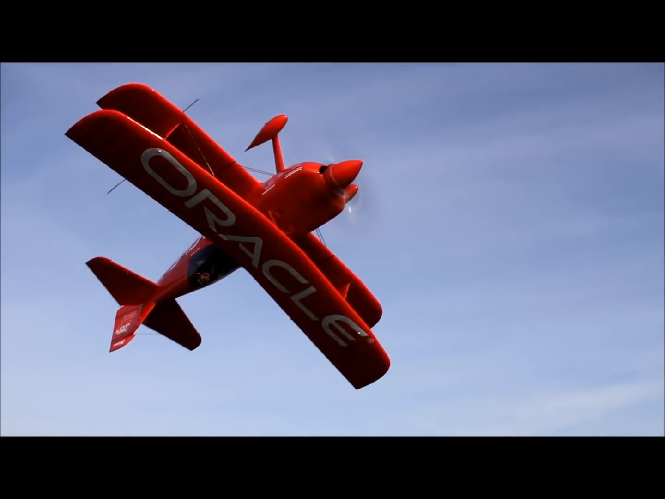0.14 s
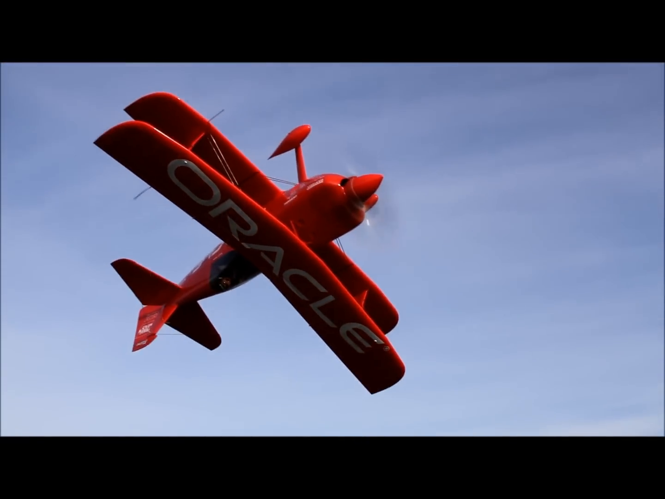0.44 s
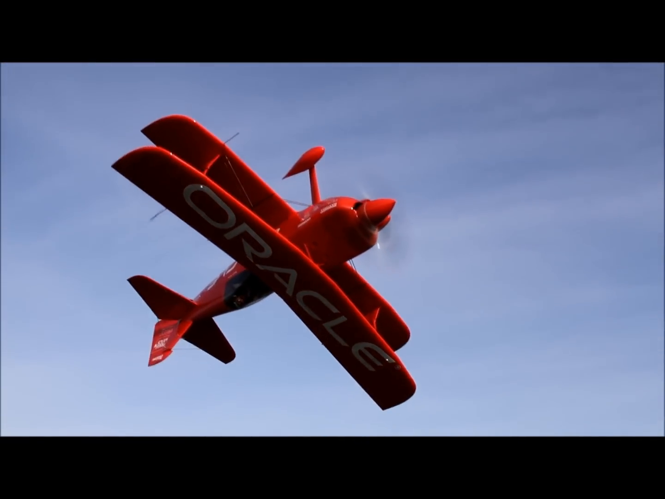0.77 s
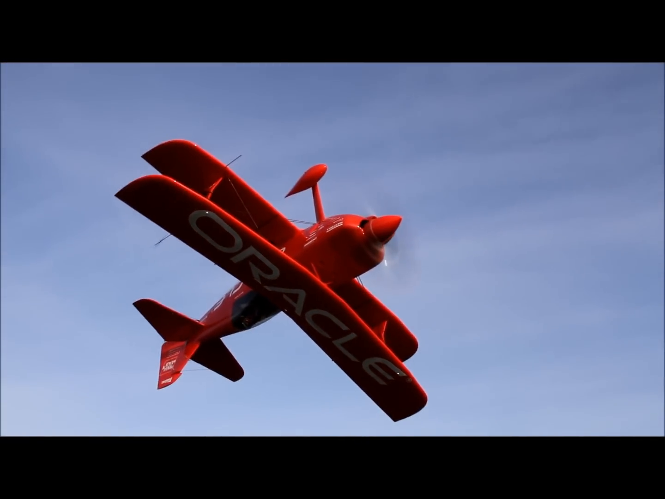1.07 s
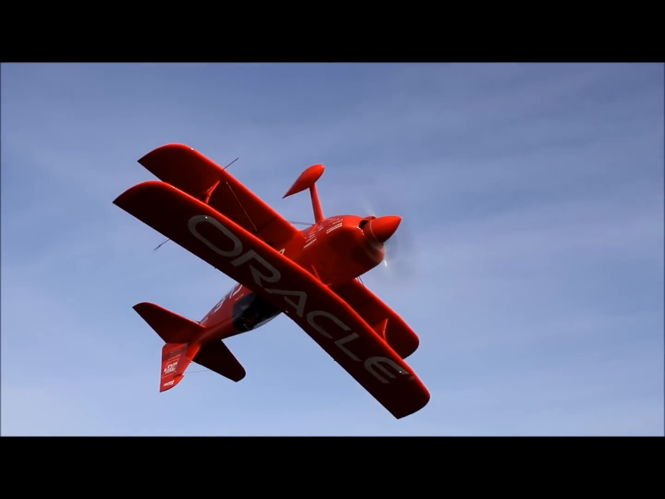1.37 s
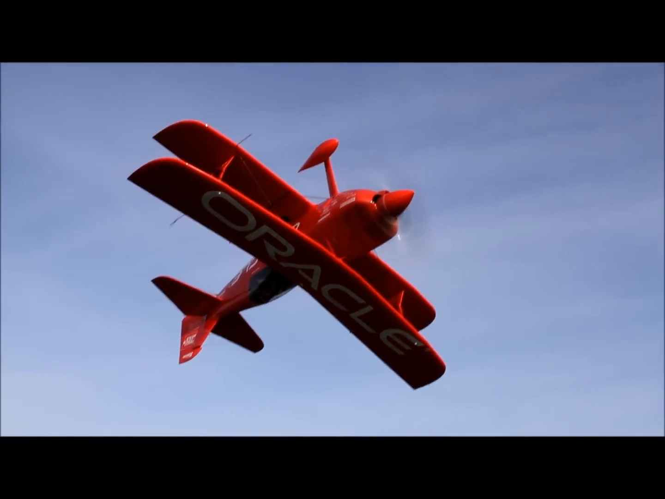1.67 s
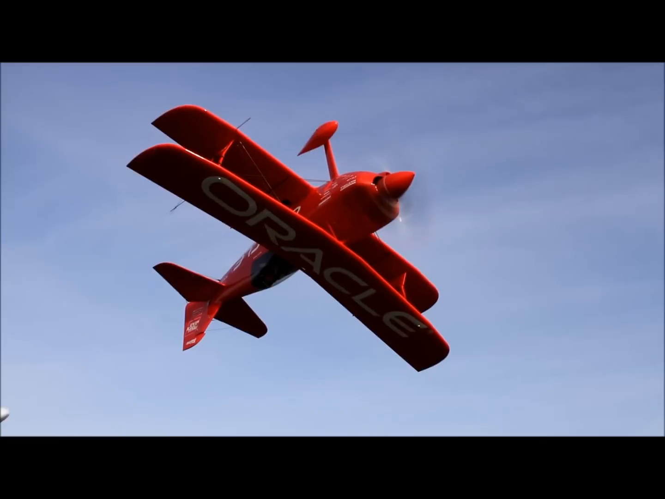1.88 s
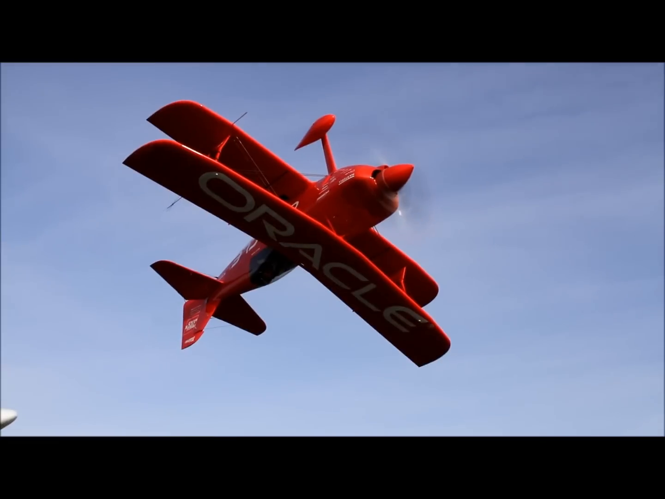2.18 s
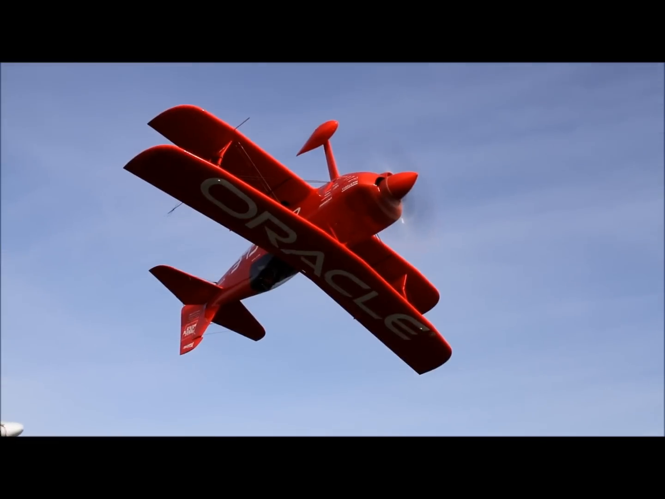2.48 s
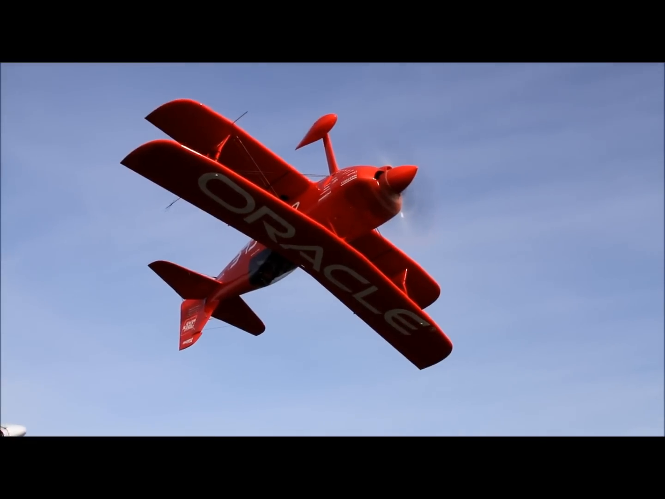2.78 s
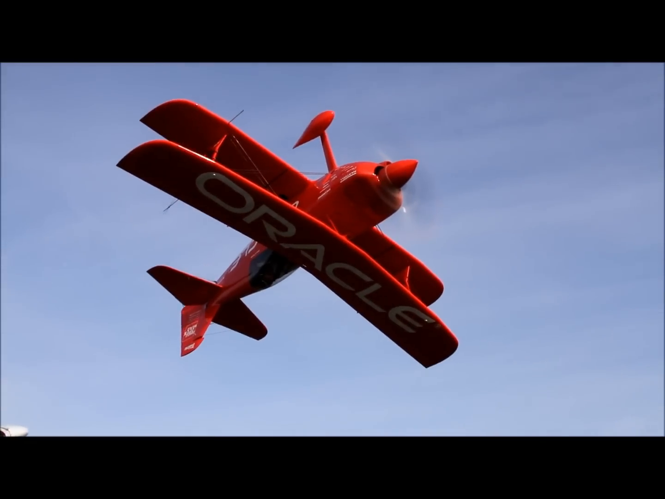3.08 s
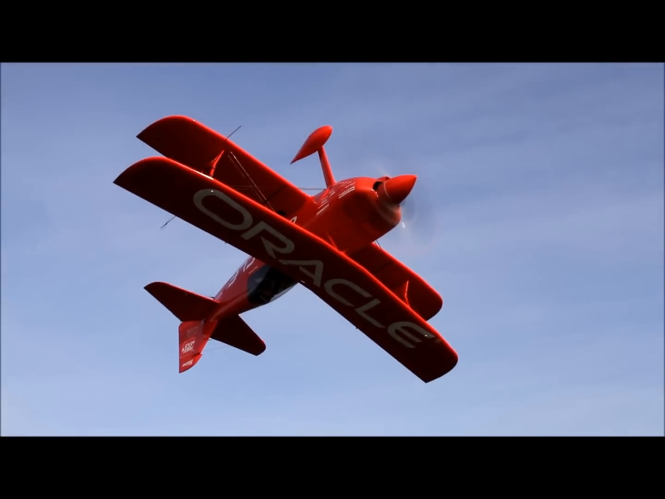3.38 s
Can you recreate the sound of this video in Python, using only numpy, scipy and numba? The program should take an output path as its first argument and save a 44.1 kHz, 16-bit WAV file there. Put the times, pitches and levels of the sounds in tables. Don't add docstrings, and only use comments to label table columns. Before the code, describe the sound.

Steady, loud propeller-engine drone and slipstream roar in open air beside an aerobatic biplane. The exposed microphone thuds and distorts with random low throbs, cutting the roar out for instants, with a brief rap late on.

```python
import sys
import numpy as np
from scipy import signal
from scipy.fft import rfft, irfft
from scipy.io import wavfile
from scipy.ndimage import uniform_filter1d
from numba import njit

SR = 44100
rng = np.random.default_rng(int(sys.argv[2]) if len(sys.argv) > 2 else 0)


def amplitude_ratio(level_db):
    exponent = np.asarray(level_db, float) / 20
    return 10 ** exponent


def store_wav(level_fs):
    pcm = np.round(np.clip(np.atleast_2d(level_fs), -1, 1) * 32767)
    wavfile.write(sys.argv[1], SR, pcm.T.astype(np.int16))


N = 156114
RAIL = 0.35


def level(x, rms_db):
    return x * amplitude_ratio(rms_db) / np.sqrt(np.mean(x ** 2))


@njit
def svf(x, hz, width_hz, high):
    y, band, low = np.empty(len(x)), 0., 0.
    g, k = np.tan(np.pi * hz / SR), width_hz / hz
    for i in range(len(x)):
        v = (band + g * (x[i] - low)) / (1 + g * (g + k))
        y[i] = high * (x[i] - k * v - low - g * v) + (1 - high) * k * v
        band, low = 2 * v - band, low + 2 * g * v
    return y


def bandpass(x, hz, width_hz):
    return svf(x, float(hz), float(width_hz), 0.)


def walk(rate_hz):
    hold = int(SR / rate_hz)
    steps = np.repeat(rng.standard_normal(N // hold + 1), hold)
    slewed = uniform_filter1d(uniform_filter1d(steps, hold), hold)[:N]
    return slewed / slewed.std()


def engine(shaft_hz, wander, flutter_db, orders):
    shaft_rad = 2 * np.pi * np.cumsum(shaft_hz * (1 + wander * walk(4))) / SR
    drone = np.zeros(N)
    for order, rms_db in orders:
        gain = np.sqrt(2) * amplitude_ratio(rms_db + flutter_db * walk(9))
        drone += gain * np.sin(order * shaft_rad + 2 * np.pi * rng.random())
    return drone


def biplane():
    # order in multiples of shaft speed, rms level in dB.
    biplane_orders = [(2, -30), (3, -21.5), (6, -24), (9, -28.5), (12, -35)]
    return engine(shaft_hz=46.44, wander=.003, flutter_db=1.2, orders=biplane_orders)


def own_engine(t):
    # order in multiples of shaft speed, rms level in dB.
    own_orders = [(3, -31), (4.5, -41.5), (6, -21), (8, -37.5), (12, -42.5), (14, -34.5), (15, -40),
                  (16, -40)]
    # time in seconds, sixth-order pitch in Hz, level in dB.
    doorway = [(0.02, 232.4, -17), (0.5, 231.0, -30), (0.51, 230.5, -16), (0.58, 230.6, -24),
               (0.71, 230.6, -19), (1.09, 230.8, -23.5), (1.16, 230.6, -13), (1.66, 230.7, -25),
               (1.87, 230.7, -13.5), (1.96, 230.6, -20), (2.23, 230.8, -22.5), (2.31, 230.7, -28),
               (2.32, 230.6, -18), (3.05, 230.7, -25.5), (3.08, 230.8, -12), (3.17, 230.1, -39),
               (3.29, 230.6, -12.5), (3.5, 230.8, -36)]
    follow = .8
    time_s, _, level_db = np.array(doorway).T
    swell_db = follow * np.interp(t, time_s, level_db - np.median(level_db))
    return amplitude_ratio(swell_db) * engine(shaft_hz=38.49, wander=.0002, flutter_db=.6, orders=own_orders)


def slipstream():
    # frequency in Hz, density in dB per Hz.
    colour = [(90, -8.5), (250, -7), (500, -14.5), (1000, -21.5), (3000, -27.5), (6000, -33.5),
              (10000, -36), (17000, -38.5)]
    swell_db, eddy_db, flicker_db = .3, 1.5, .8
    colour_hz, colour_db = np.array(colour).T
    shared_db = swell_db * walk(2.85) + eddy_db * walk(90)
    roar = np.zeros(N)
    for hz in 90 * 2 ** np.arange(0, 7.6, 1 / 2):
        band_db = np.interp(np.log(hz), np.log(colour_hz), colour_db) + shared_db + flicker_db * walk(12)
        band = bandpass(bandpass(rng.standard_normal(N), hz, hz / 2), hz, hz / 2)
        roar += amplitude_ratio(band_db) * band
    return level(roar, -17.5)


def gusty_air(t):
    # time in seconds, level in dB.
    gusts = [(0, 1), (.25, 0.), (.5, 0.5), (.8, 1), (1.15, 3.5), (1.5, 1), (1.85, .5), (2.1, 2), (2.5, 1.),
             (2.9, 2.5), (3.3, 1), (3.54, 2.5)]
    presence_db, presence_hz, presence_width_hz = 7, 14300, 3500
    gust_s, gust_db = np.array(gusts).T
    air = amplitude_ratio(np.interp(t, gust_s, gust_db)) * slipstream()
    return air + amplitude_ratio(presence_db) * bandpass(air, presence_hz, presence_width_hz)


def knock(t):
    start_s, peak_db, hz, t60_s = 2.5168, 5, 1150, .01
    age_s = np.maximum(t - start_s, 0)
    envelope = (age_s < 2 / hz) * 1000. ** (-age_s / t60_s)
    return -amplitude_ratio(peak_db) * envelope * np.sin(2 * np.pi * hz * age_s)


def throb(t):
    # main crest in seconds, signed size re the rail, pitch in Hz, length in seconds.
    strong_swings = [(.003, 1.8, 46, .02), (.327, 1.6, 40, .035), (.505, -1.6, 48, .022),
                     (.6079, -2.25, 45, .095), (.6765, 3., 42, .034), (.7634, -1.9, 49, .085),
                     (.8587, 2.9, 42, .022), (.8983, 2.2, 46, .065), (.9591, 3., 42, .024),
                     (1.0135, 1.6, 46, .04), (1.2686, 2.3, 44, .025), (1.3033, -1.6, 46, .04),
                     (1.4286, 2.4, 45, .024), (1.5904, -1.6, 46, .03), (1.6604, 2.7, 50, .04),
                     (1.7171, 3., 42, .034), (1.9876, 2.3, 44, .024), (2.021, -2.2, 46, .03),
                     (2.0913, 2., 46, .03), (2.2041, -2.7, 46, .02), (2.2821, -3.2, 44, .036),
                     (2.3629, 1.5, 48, .02), (2.5232, 1.9, 46, .025), (2.8247, 1.9, 47, .065),
                     (3.0459, 3., 42, .022), (3.1437, 2.4, 44, .022), (3.1758, -3.3, 41, .055),
                     (3.2139, -3.2, 40, .024), (3.2443, 3.6, 38, .036), (3.5306, -2.8, 46, .045)]
    ring_hz, ring_width_hz, ring_db = 49, 11.2, -14.5
    rumble_hz, rumble_db = 26.5, -19.5
    duck = .95

    swings, busy = np.zeros(N), np.zeros(N)
    for crest_s, size, hz, length_s in strong_swings:
        age_s = t - crest_s
        shape = np.cos(np.pi * np.clip(age_s / length_s, -.5, .5)) ** 0.64
        swings += RAIL * size * shape * np.cos(2 * np.pi * hz * age_s)
        busy = np.maximum(busy, shape)

    ring = bandpass(rng.standard_normal(N), ring_hz, ring_width_hz)
    ring = bandpass(ring, ring_hz, 4.1 * ring_width_hz)
    rumble = bandpass(rng.standard_normal(N), rumble_hz, rumble_hz)
    rumble = bandpass(rumble, rumble_hz, rumble_hz)
    loose = level(ring, ring_db) + level(rumble, rumble_db)
    return swings + (1 - duck * busy) * loose


def scene():
    t = np.arange(N) / SR
    return (biplane() + own_engine(t) + gusty_air(t) + knock(t) + throb(t))[None]


def band_limit(x):
    return signal.sosfilt(signal.butter(12, 16960, fs=SR, output="sos"), x)


def record(dry):
    knee = 18.7
    lowcut_hz, lowcut_damp, hiss_db = 114., 1.54, -64
    top_hz, end_hz, edge_width_hz = 15780, 16600, 60
    shelf_db, splash_s, splash_share = -16, .04, .47

    railed = dry[0] / (1 + np.abs(dry[0] / RAIL) ** knee) ** (1 / knee)
    cut = svf(railed, lowcut_hz, lowcut_damp * lowcut_hz, 1.)
    cut = cut + level(rng.standard_normal(N), hiss_db)

    hz, spectrum = np.arange(N // 2 + 1) * SR / N, rfft(cut)

    def fall(edge_hz):
        return np.clip(1 / 2 - (hz - edge_hz) / (4 * edge_width_hz), 0, 1) ** 2

    overload = uniform_filter1d(1. * (np.abs(dry[0]) > RAIL), int(splash_s * SR))
    opening = np.clip(10 * (overload - splash_share), 0, 1)
    splash = opening * irfft(spectrum * fall(end_hz) * (1 - fall(top_hz)), N)
    mix = irfft(spectrum * fall(top_hz), N) + amplitude_ratio(shelf_db) * splash
    return band_limit(mix[None])


dry = scene()
out = record(dry)
store_wav(out)
```